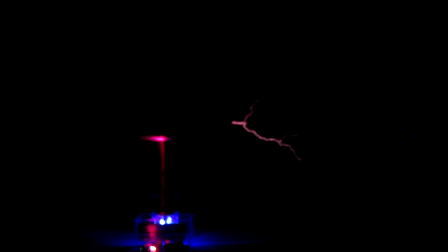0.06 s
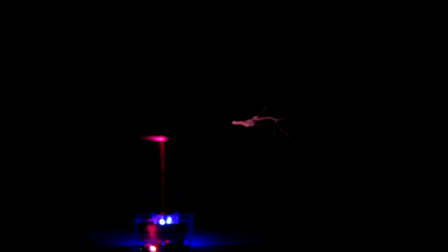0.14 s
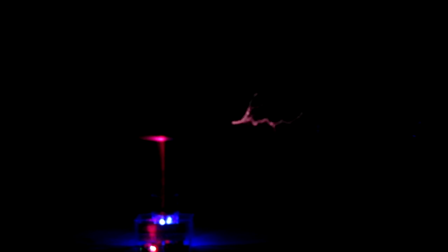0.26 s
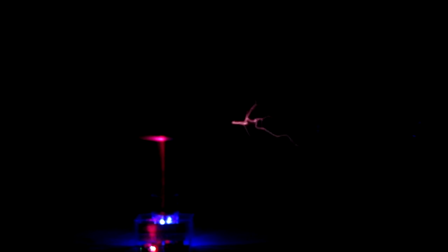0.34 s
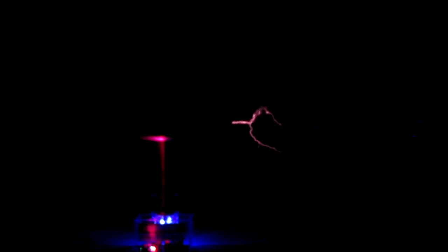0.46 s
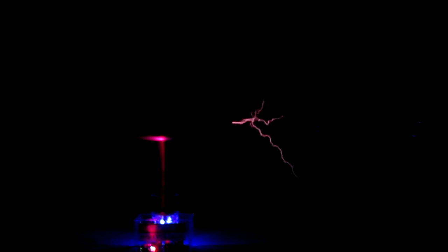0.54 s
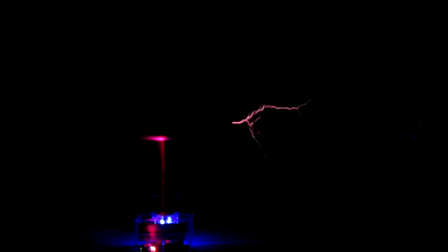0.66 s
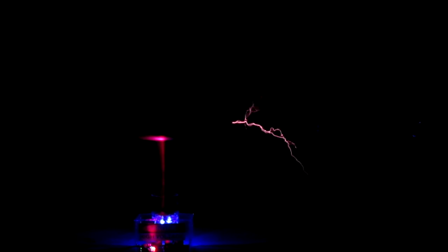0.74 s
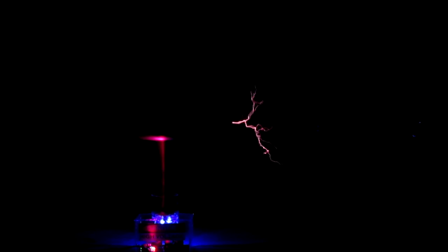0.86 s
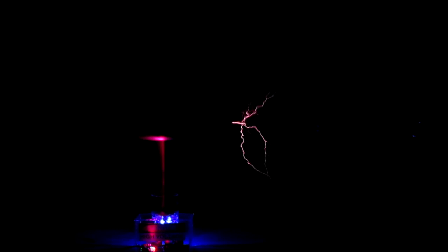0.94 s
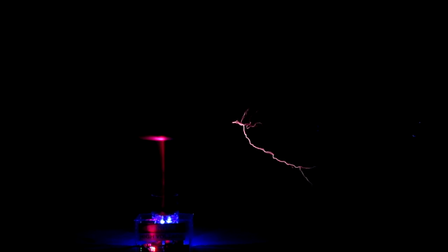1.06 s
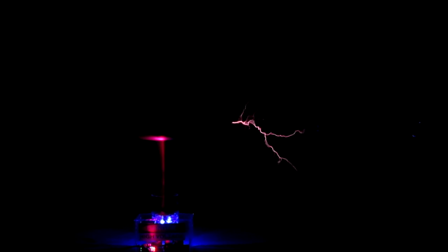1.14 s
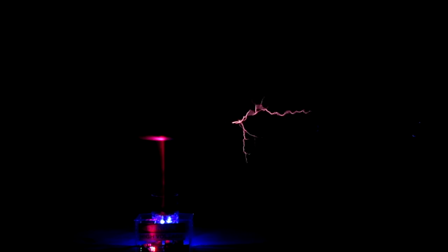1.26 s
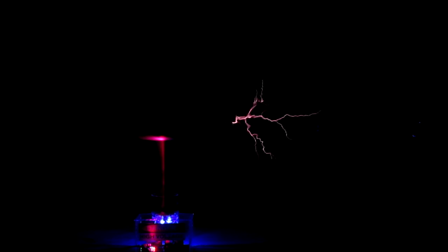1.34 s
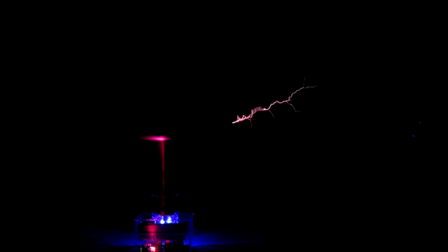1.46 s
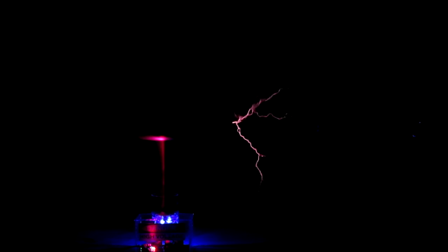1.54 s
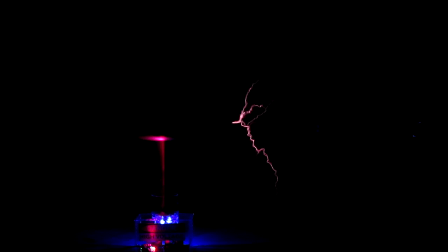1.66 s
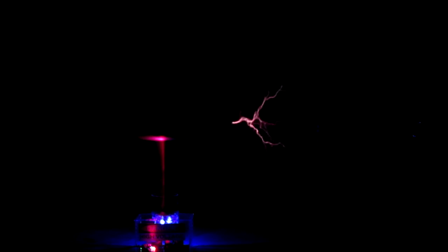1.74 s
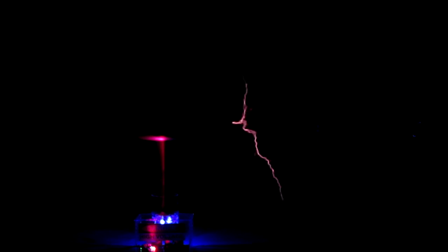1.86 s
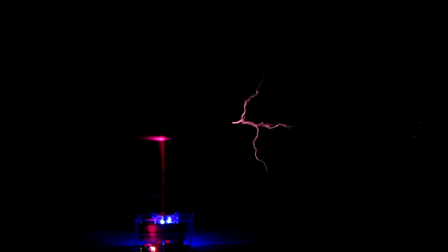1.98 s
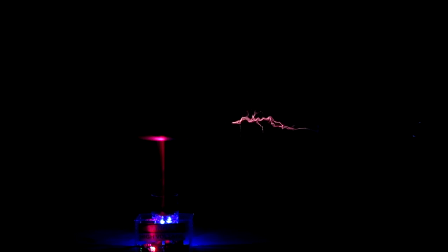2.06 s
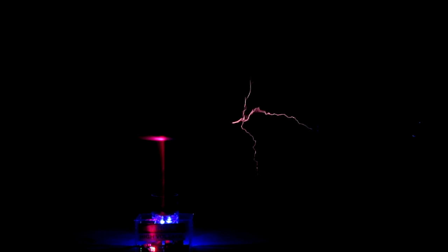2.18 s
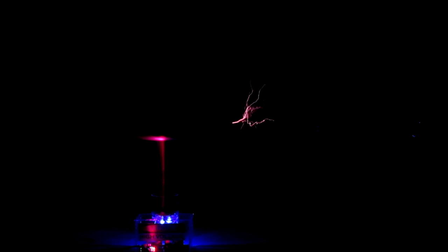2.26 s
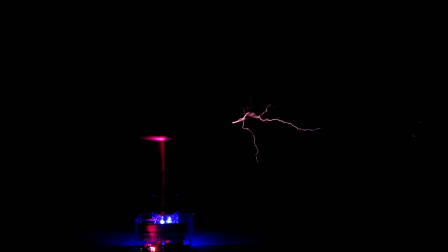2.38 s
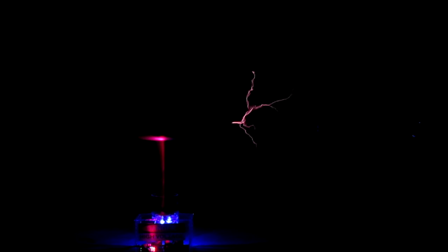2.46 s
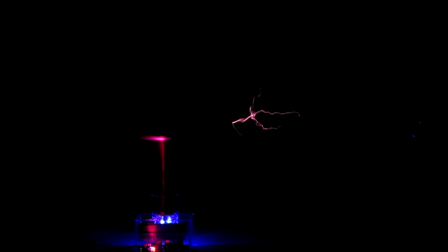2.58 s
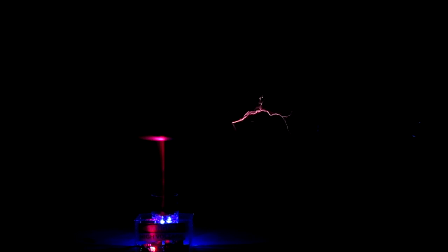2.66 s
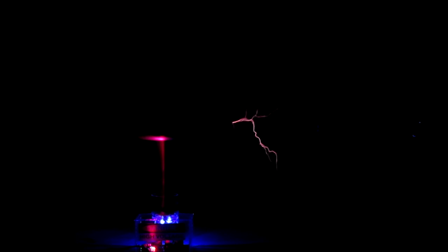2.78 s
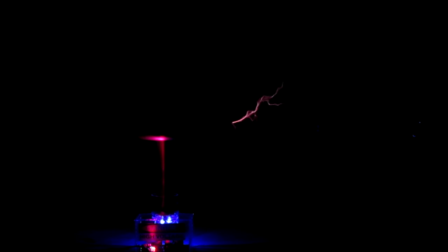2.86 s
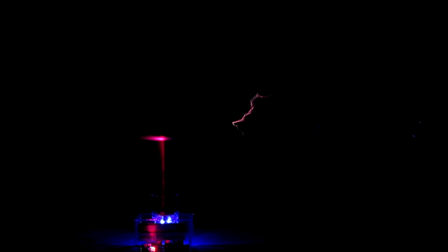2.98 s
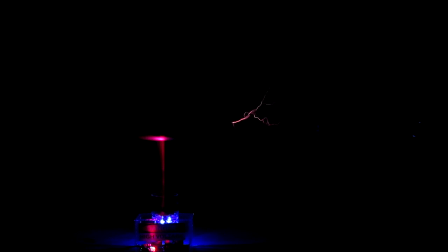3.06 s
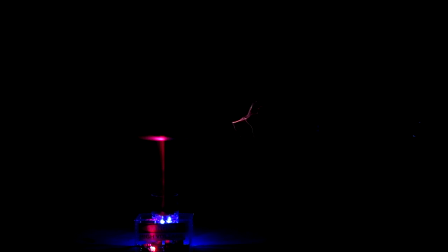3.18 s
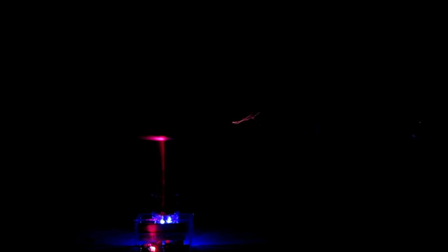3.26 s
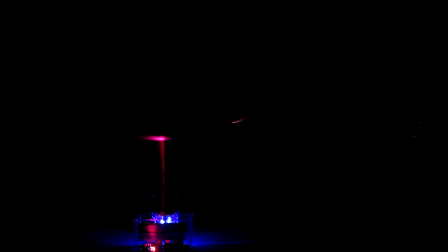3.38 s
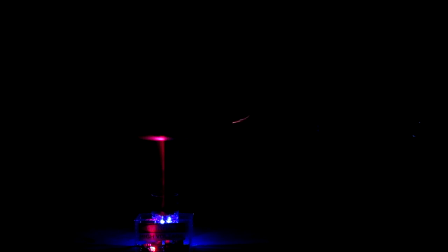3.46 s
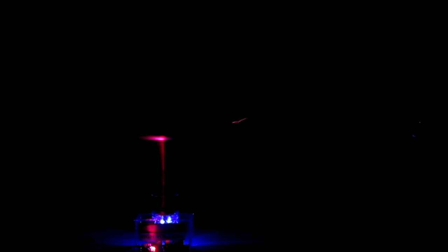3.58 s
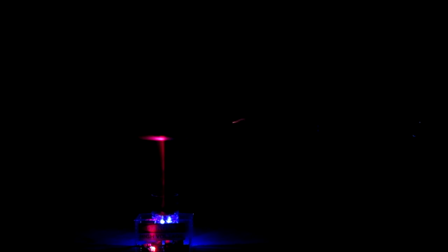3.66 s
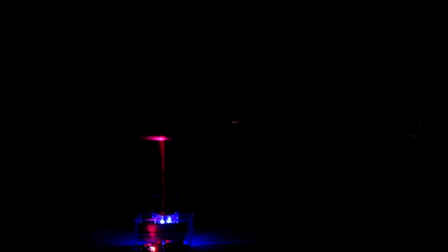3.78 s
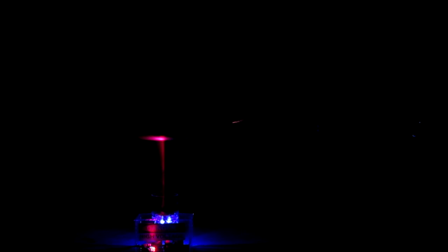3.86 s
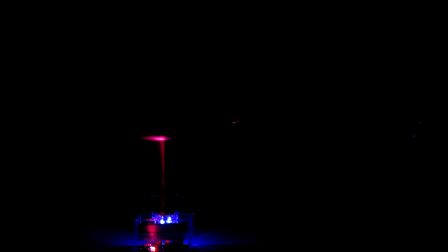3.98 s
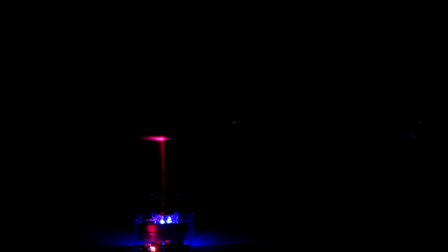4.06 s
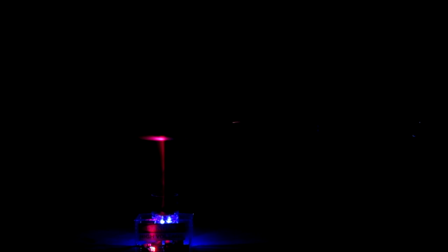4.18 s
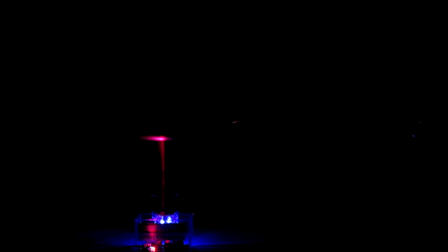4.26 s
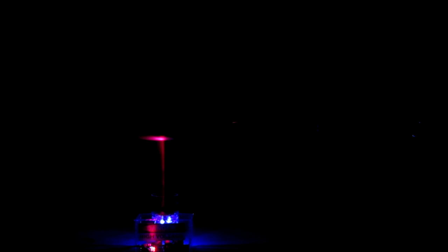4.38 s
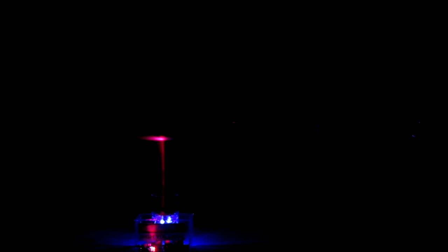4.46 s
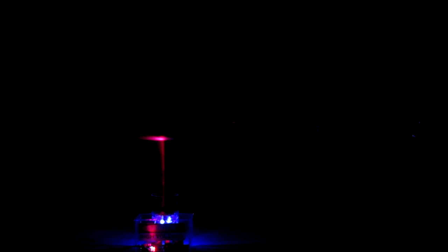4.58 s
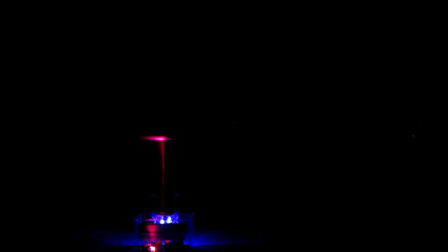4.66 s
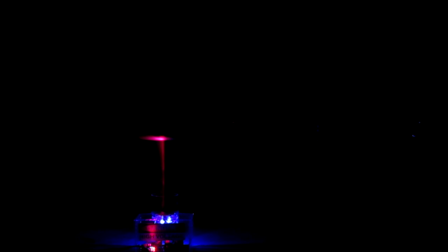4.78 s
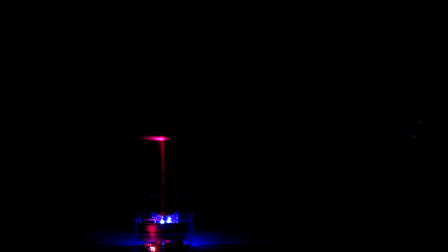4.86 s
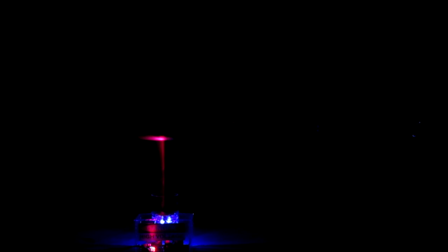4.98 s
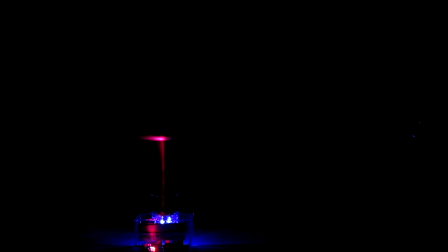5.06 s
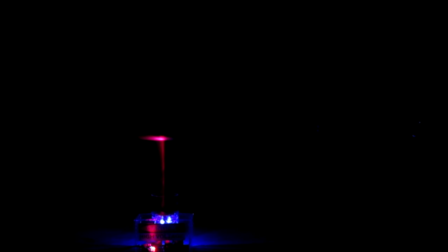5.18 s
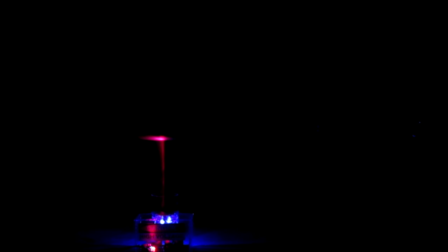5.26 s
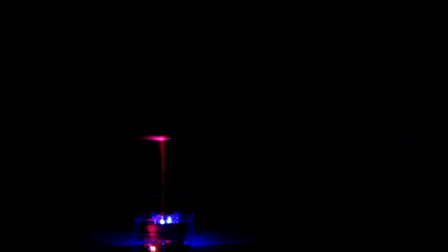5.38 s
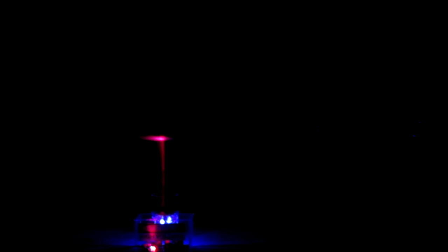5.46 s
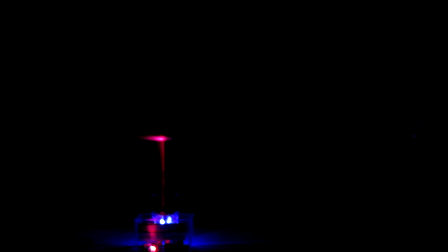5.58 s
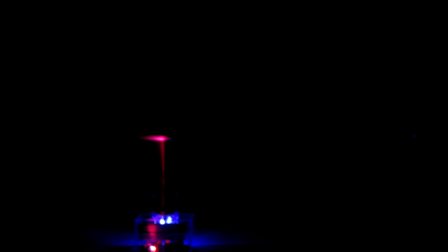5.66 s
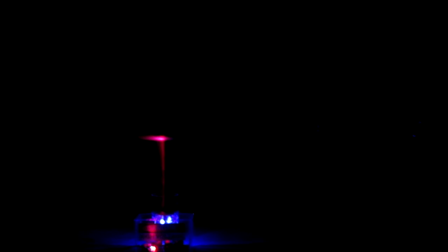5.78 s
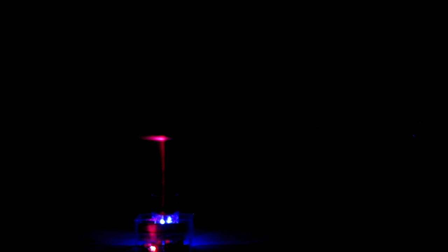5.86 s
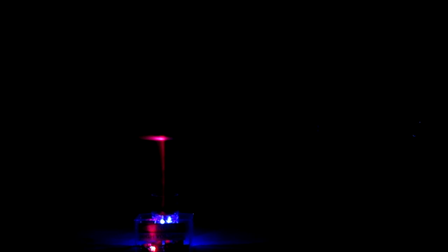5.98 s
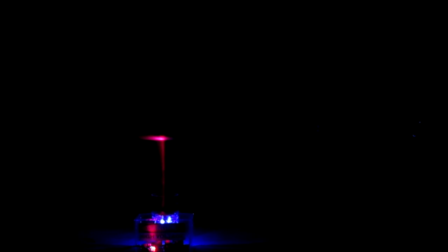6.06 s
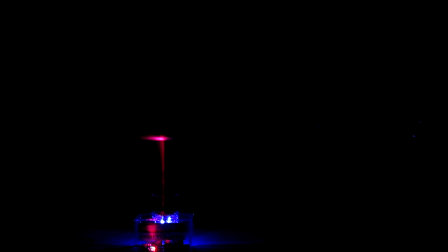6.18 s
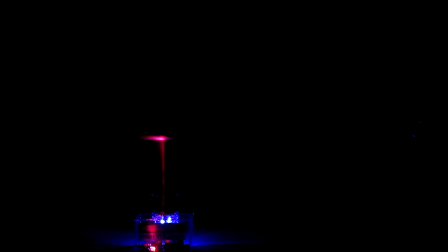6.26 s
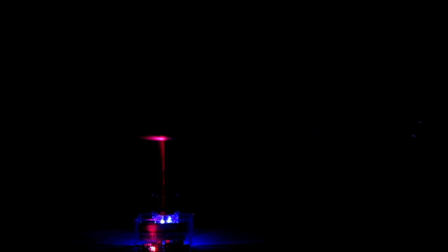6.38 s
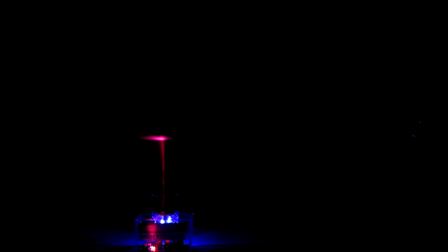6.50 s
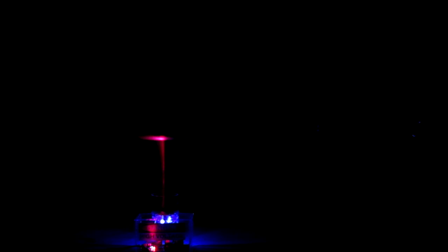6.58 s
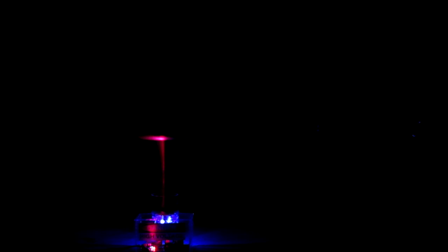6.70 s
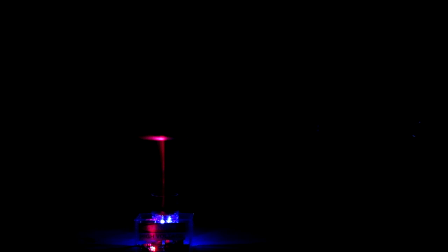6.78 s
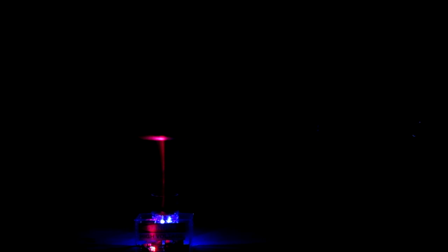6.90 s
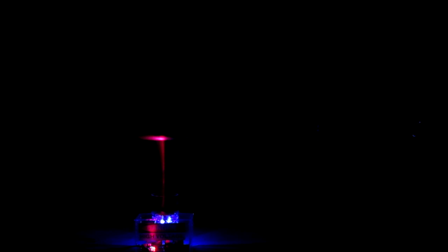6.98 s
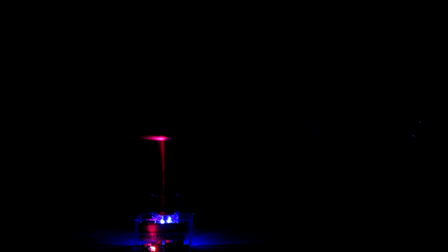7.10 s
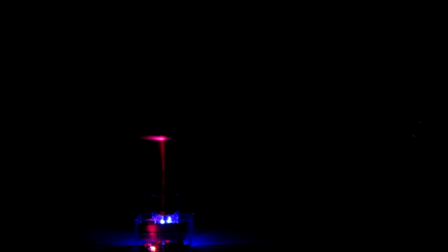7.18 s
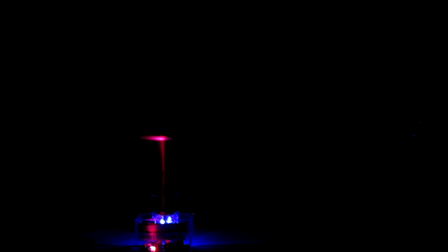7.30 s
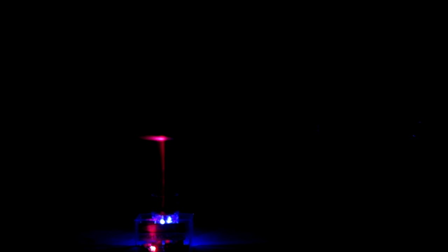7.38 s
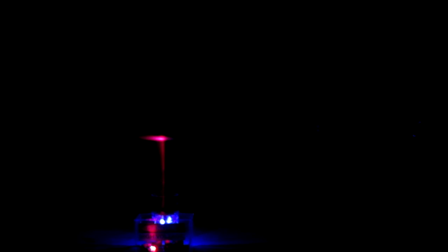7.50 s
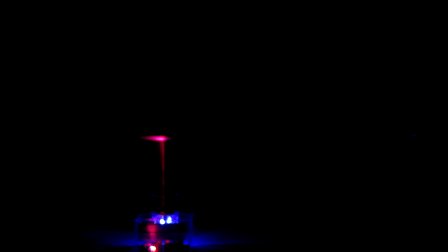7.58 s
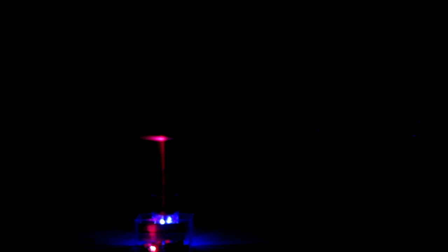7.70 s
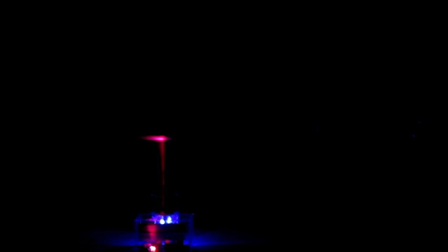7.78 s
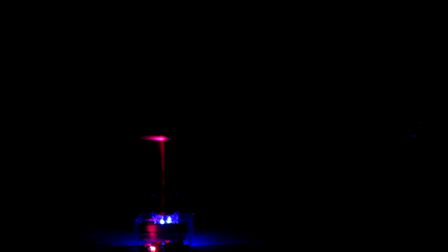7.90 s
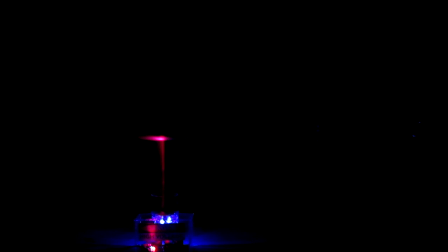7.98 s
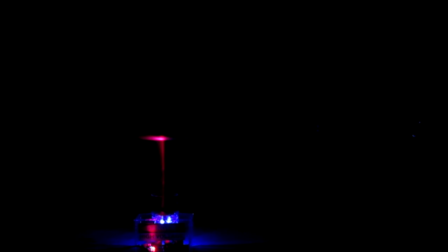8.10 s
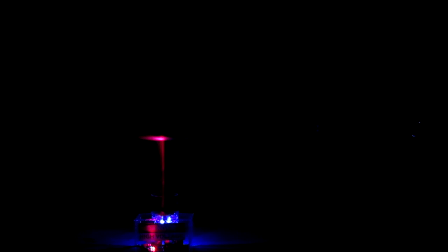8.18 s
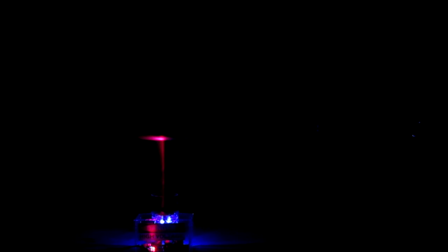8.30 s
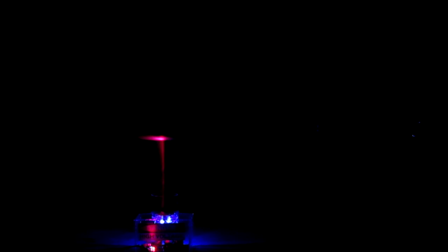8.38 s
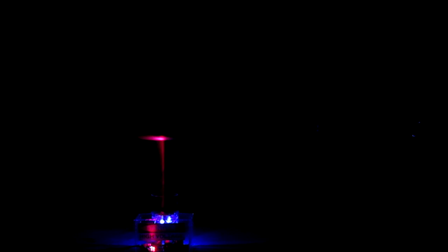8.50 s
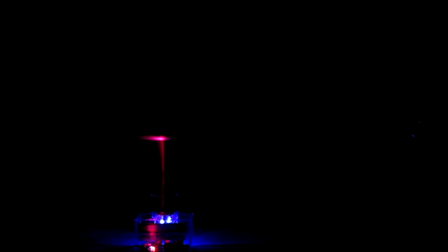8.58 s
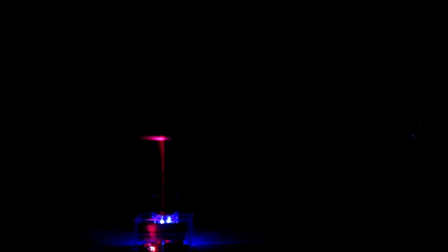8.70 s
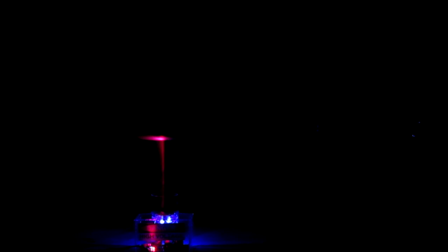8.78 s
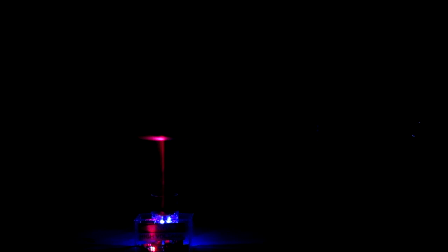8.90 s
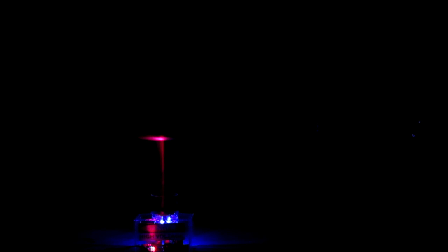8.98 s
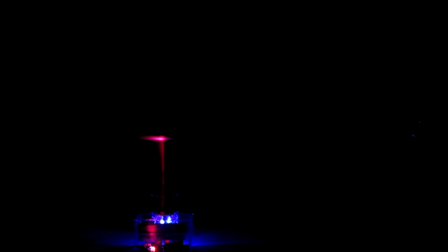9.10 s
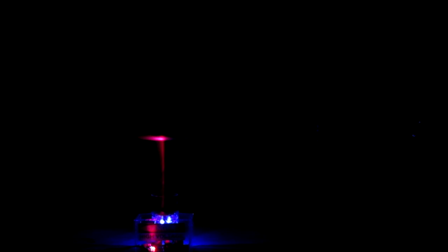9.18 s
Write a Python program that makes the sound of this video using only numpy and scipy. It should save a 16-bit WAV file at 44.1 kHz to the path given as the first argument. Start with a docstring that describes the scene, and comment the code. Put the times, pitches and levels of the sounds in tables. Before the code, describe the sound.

A high-voltage spark coil is already firing in a garage, picked up in stereo with hard, short reflections. From 0 to 3 s it is a loud, rasping buzz at about 214 bangs a second, sagging to 212 around 1 to 2 s, then creeping up; bright treble crackle and restless sputter ride on low harmonics, with dull pops near 2.3 and 3.0 to 3.2 s. From 3 s it weakens quickly, crackling in spurts until about 4.5 s, then drops in steps to a thin, steady, buzzing sizzle near 217 a second by 5 s. Sharp lone snaps come at about 5.0, 5.9, 6.2, 6.75 and 7.0 s. At 7.1 s the coil cuts off with a brief ring. Cooling fans, humming with several mid-low tones and rushing air, gradually swell as the recorder's gain recovers, and continue alone to the end; a faint dry tick falls at 8.8 s.

```python
"""In a garage, a high-voltage spark coil fires some 212 to 217 times a second, its cooling fans running.
Long branching sparks buzz harshly: each bang sends out shocks and drives the low harmonics of the buzz.
They shrink to a steady corona sizzle with a few lone snaps, and the coil is switched off.
The recorder's gain control recovers slowly as the sparks weaken, so that the fan tones and air rush swell.
A faint dry tick comes near the end."""
import sys
import numpy as np
from scipy import signal
from scipy.fft import rfft, irfft, next_fast_len
from scipy.io import wavfile
from scipy.ndimage import uniform_filter1d, map_coordinates

SR = 44100
rng = np.random.default_rng(int(sys.argv[2]) if len(sys.argv) > 2 else 0)


def store_pcm(level_fs):
    """Save levels as 16-bit WAV."""
    pcm = np.round(np.clip(level_fs, -1, 1) * 32767).astype(np.int16)
    wavfile.write(sys.argv[1], SR, np.atleast_2d(pcm).T)


N = 407484
LEAD = SR // 2  # samples run before time zero, so that everything is already sounding
TIME = np.arange(-LEAD, N) / SR  # s
SIZE = len(TIME)

# All levels are ahead of the recorder's gain control; spectra are relative.
# Tones of the fans. Each row: frequency in Hz, level in dB before the common trim.
FAN_TONES = [(91.5, -57), (118.4, -58.5), (140.0, -59), (177.6, -43.5), (274.5, -46.5), (333.8, -51),
             (387.6, -47), (414.5, -49), (554.5, -43), (726.7, -49), (969.0, -59), (1168, -56), (1459, -65)]
# Shaft rumble, and a second fan beating against the first. Each row: frequency in Hz, level in dB before the trim.
SLOW_FAN_TONES = [(27.8, -54.5), (174.5, -51)]
# Rush of air through the fans. Each row: frequency in Hz, level in dB per Hz.
FAN_RUSH = [(25, -16), (60, -14.5), (170, -8.5), (250, -13.5), (450, -10.5), (720, -9), (1100, -17.5),
            (1600, -18.5), (2200, -26.5), (4500, -36), (6500, -35.5), (10300, -44.5), (11000, -35.5),
            (11700, -44), (15500, -48)]
# Likeness of the air rush at left and right. Each row: frequency in Hz, likeness from 0 to 1.
FAN_LIKENESS = [(60, 0.29), (180, 0.95), (550, 0.73), (1650, 0.72), (5000, 0.033)]
FAN_TONES_DB, FAN_RUSH_DB = -24, -60  # trim of all tones; level of the rush

# A faint dry tick near the end. Each row: start in seconds, level in dB before its lift.
TICK = [(8.8385, -50)]
# Colour of the tick. Each row: frequency in Hz, level in dB per Hz.
TICK_COLOUR = [(1500, -26), (4500, -3), (7000, 1), (10000, -15), (15000, -22)]

# Surfaces near the coil. Each row: left delay in ms, right delay in ms, level in dB against direct sound.
NEAR_ECHOES = [(2.3, 2.9, -16), (4.5, 4.56, -11), (6.87, 6.89, -3.5), (7.05, 7.2, -11), (9.35, 9.25, -10)]
# Decay of the garage. Each row: frequency in Hz, time to fall by 60 dB in seconds.
GARAGE_DECAY = [(1000, 0.6), (5000, 0.43), (9000, 0.4), (15000, 0.25)]
TAIL_DB = -0.5  # diffuse tail against direct sound
# The nearest surface: delay left and right (ms), its swing as the arc moves (ms, per s), and its level
BOUNCE_MS = (.55, .575)
BOUNCE_SWING_MS, BOUNCE_SWINGS_PER_S, BOUNCE_DB = .07, 18, -3.5
# Standing waves that lift or cancel a harmonic sliding across them. Each row: centre in Hz, lift in dB.
STANDING_WAVES = [(646, -14.5), (865, -8), (1061, 11), (1069, -2.5), (1077, 7.5), (1286, 7), (1294, -3),
                  (1300, 8), (1485, 6.5), (1506, 11), (1697, 4), (1711, 5.5), (1950, -28)]
STANDING_WIDTH_HZ = 2.8
# Lean of the coil's sound between the sides. Each row: frequency in Hz, left minus right in dB.
COIL_BALANCE = [(400, 0.3), (700, 0.6), (1250, -1.5), (2400, -0.5), (4400, -2.2), (8100, 2.3), (15000, 1.5)]

# The interrupter. Each row: time in seconds, bangs per second.
FIRING = [(0, 214), (0.42, 214), (0.88, 212.1), (1.95, 212.12), (2.55, 213.9), (3.0, 214.67), (3.5, 215.3),
          (5.09, 216.1), (5.15, 216.63), (7.1, 216.63)]
OFF_S = 7.112  # switch-off
# Power fed to the sparks: full, then a slide and three steps down. Each row: time in seconds, power in dB.
POWER = [(0, 1.3), (2.7, 2.5), (3.02, -0.5), (3.5, -7.5), (4.0, -10.5), (4.32, -12), (4.35, -13.5),
         (4.63, -15.5), (4.655, -19), (4.925, -20.5), (4.945, -27), (7.1, -27)]
# The rate sags as the channel thickens and loads the supply: bangs per s, bare corona and thickest channel
IDLE_RATE, LOADED_RATE = 216.6, 212.1
THICKNESS_CURVE = 0.91
# Below these powers the branches settle and the tips stop sputtering (dB); share of tips lost when thick
WRITHE_FULL_DB, SPUTTER_FULL_DB, THICK_TIP_LOSS = -3, -12, 0.45
CORONA_ONLY_DB, CORONA_GONE_DB = -21, -9  # between these powers the streamer shrinks to bare corona

# Lone flashovers. Each row: start in seconds, level in dB before their lift.
SNAPS = [(4.9576, -28), (5.8905, -27.5), (6.1814, -27.5), (6.7538, -28), (7.0446, -28)]
# Colour of the flashovers. Each row: frequency in Hz, level in dB per Hz.
SNAP_COLOUR = [(600, -17), (1300, -16), (3300, -11), (6500, -3.5), (10000, -8), (16000, -11.5)]
# Dull pops as a long streamer flares. Each row: start in seconds, level in dB before their lift.
POPS = [(2.32, -7), (2.48, -22), (2.995, -11), (3.045, -17), (3.207, -26), (3.214, -9.5)]
# Colour of the pops. Each row: frequency in Hz, level in dB per Hz.
POP_COLOUR = [(60, -18), (200, -14), (450, 3), (800, 1), (2000, -2), (8000, -67)]

# Swells of the thump as the channel flares. Each row: centre in seconds, lift in dB.
THUMP_SWELLS = [(0.79, 5), (1.04, 6.5), (2.33, 7), (2.48, 10), (2.72, 2)]
SWELL_S = 0.02  # from the centre of a swell to 1/e of its lift
# At 0 dB of power: the sharp crack, the buzz of the channel, the thump of the heated air (dB)
CRACK_DB, BUZZ_DB, THUMP_DB = -18, -29, -44
# Buzz and thump shrink faster than the crack (dB per dB of power); a thick channel buzzes louder (dB)
BUZZ_FOLLOWS, THUMP_FOLLOWS, THICK_BUZZ_DB = 1.216, 2.24, 4
UPPER_FOLLOWS = 0.19  # extra shrinking of the upper harmonics, dB per dB of power
HARMONICS = 13
# Colour of the buzz. Each row: frequency in Hz, level in dB.
BUZZ_COLOUR = [(214, -5), (430, -4), (640, -11), (1100, -14), (1700, -13.5), (2000, -10.5), (2400, -15.5),
               (2800, -14)]

# Spells of crackle as the shrinking streamer forks. Each row: start in seconds, level in dB, fade in seconds.
CRACKLE_SPELLS = [(3.35, -24, .02), (3.605, -19, .025), (4.034, -18, .018), (4.218, -29, .02),
                  (4.27, -25, 0.044), (4.451, -19, 0.025), (4.975, -33, .025)]
# Colour of the crackle. Each row: frequency in Hz, level in dB per Hz.
CRACKLE_COLOUR = [(300, -50), (1200, -24), (2300, -11), (3300, 0), (4200, -5), (6500, -2), (10000, -14),
                  (16000, -22)]
SPIT_DB, SPIT_PATCHY_DB = -22, 3  # random spitting: level at 0 dB of power, and how patchy

# Crack of a thick channel. Each row: frequency in Hz, level in dB per Hz.
THICK_COLOUR = [(2500, -0.5), (3300, 2), (4200, -3.5), (5400, -1), (7000, -2.5), (8800, -5.5), (10500, -14),
                (13000, -13.5), (15500, -13)]
# Crack of a thin streamer. Each row: frequency in Hz, level in dB per Hz.
THIN_COLOUR = [(2500, -17.5), (3200, -7.5), (4200, -4), (5000, -4), (5900, -1), (7000, 0), (8800, -5),
               (10500, -11), (13000, -8), (15500, -8)]
# Crack of bare corona. Each row: frequency in Hz, level in dB per Hz.
CORONA_COLOUR = [(800, -18.5), (1300, -20), (1800, -13), (2350, -11), (2950, -6), (3500, -7), (4400, -3),
                 (5100, -3.5), (5900, 1), (7000, 1.5), (8700, -1), (10000, -5.5), (11500, -1.5),
                 (15500, -6)]
# Sputter of the tips. Each row: frequency in Hz, level in dB per Hz.
SPUTTER_COLOUR = [(5200, 1.5), (6800, 1), (8600, 3), (10200, -5.5), (12300, 0.5), (15500, -6)]
# Fine fizz that stays once the arc has settled. Each row: frequency in Hz, level in dB per Hz.
FIZZ_COLOUR = [(5200, -6), (9000, -6), (10500, -6), (12500, 0), (15000, 0), (17000, -8)]
FIZZ_SHARE, TIPS_LOW_HZ = .21, 4950  # fizz against the crack; lower edge of sputter and fizz

CUTOFF_HZ = 15950  # top of what the recorder keeps


def from_db(db):
    """Decibels to gain."""
    return 10 ** (np.asarray(db) / 20)


def rms_one(x):
    """Scale to rms 1."""
    return x / np.sqrt(np.mean(x ** 2) + 1e-20)


def evened(x, size=1640):
    """Hold the level near rms 1 from moment to moment, over a window of the given samples."""
    power = np.abs(uniform_filter1d(x ** 2, size=size))
    return x / np.sqrt(power + 1e-9)


def in_time(rows, at=TIME):
    """Each column of a curve at the given times."""
    s, *columns = np.transpose(rows)
    return [np.interp(at, s, c) for c in columns]


def at_hz(points, hz):
    """Read a table on a log-frequency axis."""
    f, value = np.transpose(points)
    return np.interp(np.log(np.maximum(hz, 1)), np.log(f), value)


def drift(per_s, at=TIME):
    """Smooth random wandering with a spread of about 1."""
    knots = signal.resample_poly(rng.standard_normal(2048), 4, 1)
    return np.interp((at - TIME[0]) * per_s * 4, np.arange(len(knots)), knots)


def colour(x, spectrum, size=1024):
    """Causal filter of unit energy with the given spectrum."""
    hz = np.linspace(0, SR / 2, size // 2 + 1)
    cepstrum = irfft(np.log(from_db(at_hz(spectrum, hz))))
    # folding the cepstrum forward gives minimum phase: a sharp onset
    cepstrum[1:size // 2] *= 2
    cepstrum[size // 2 + 1:] = 0
    pulse = irfft(np.exp(rfft(cepstrum)))
    return signal.oaconvolve(x, pulse / np.linalg.norm(pulse))[:len(x)]


def clicks(places, heights, length=SIZE):
    """Band-limited clicks at fractional sample places."""
    taps = np.floor(places).astype(int)[:, None] + np.arange(-4, 6)
    off = taps - places[:, None]
    shape = np.sinc(off) * np.sinc(off / 5)
    inside = np.clip(taps, 0, length).ravel()
    return np.bincount(inside, (shape * heights[:, None]).ravel(), length + 1)[:length]


def fans(waver_db=2.5, waver_rad=0.49, width_rad=0.15, lag=4):
    """Blade and motor tones over a smooth rush of air; the right side lags some samples, leaning it left."""
    hz = np.linspace(0, SR / 2, next_fast_len(SIZE) // 2 + 1)
    alike = np.clip(at_hz(FAN_LIKENESS, hz), 0, 1)
    mid, side = rfft(rng.standard_normal((2, 2 * len(hz) - 2)))
    air = np.sqrt(1 + alike) * mid + np.sqrt(1 - alike) * side * [[1], [-1]]
    rush = rms_one(irfft(air * from_db(at_hz(FAN_RUSH, hz)))[:, :SIZE])
    tones = 0
    for k, (tone_hz, level_db) in enumerate(list(FAN_TONES) + list(SLOW_FAN_TONES)):
        phase = 2 * np.pi * (tone_hz * TIME + rng.random()) + waver_rad * drift(3.7)
        apart = width_rad * (-1) ** k * np.array([[1], [-1]])
        gain = from_db(level_db + waver_db * drift(6))
        tones = tones + np.sqrt(2) * gain * np.sin(phase + apart)
    left, right = from_db(FAN_RUSH_DB) * rush + from_db(FAN_TONES_DB) * tones
    return np.array([left, np.roll(right, round(lag))])


def unrest(full_db, at=TIME):
    """Restlessness 0-1: full above the given power, dying in proportion below it."""
    power_db, = in_time(POWER, at)
    return np.minimum(from_db(power_db - full_db), 1)


def writhing(at=TIME):
    """How freely the arc moves, 0-1: it settles quickly once the power falls."""
    return unrest(WRITHE_FULL_DB, at) ** 2


def thickness_at(at=TIME):
    """Thickness of the channel 0-1, which goes with the sag of the firing rate."""
    rate, = in_time(FIRING, at)
    sag = np.clip((IDLE_RATE - rate) / (IDLE_RATE - LOADED_RATE), 0, 1)
    return sag ** THICKNESS_CURVE


def bang_times(turns):
    """The moments at which the interrupter fires: one at each whole turn."""
    return np.interp(np.arange(1, int(turns[-1])), turns, TIME)


def bounce(x):
    """Reflection from the nearest surface; its delay swings as the arc moves, so its comb colour shifts."""
    swing_ms = BOUNCE_SWING_MS * writhing()
    sides = []
    for ms in BOUNCE_MS:
        delay_ms = ms + swing_ms * drift(BOUNCE_SWINGS_PER_S)
        places = np.arange(SIZE) - delay_ms * SR / 1000
        sides.append(from_db(BOUNCE_DB) * map_coordinates(x, [places], order=3))
    return sides


def garage(x, build_s=0.016):
    """Direct sound, echoes from near surfaces, and a diffuse tail whose treble dies first."""
    t = np.arange(SR * 2 // 3) / SR
    edges = np.geomspace(500, 18000, num=9)  # Hz
    tail = 0
    for low, high in zip(edges, edges[1:]):
        band_pass = signal.butter(2, [low, high], "band", fs=SR, output="sos")
        band = signal.sosfilt(band_pass, rng.standard_normal((2, len(t))))
        t60 = at_hz(GARAGE_DECAY, np.sqrt(low * high))
        tail = tail + band * from_db(-60 * t / t60) / np.sqrt(t60)
    tail = rms_one(tail * (1 - np.exp(-t / build_s)))
    tail = from_db(TAIL_DB) * tail / np.sqrt(len(t))
    *sides_ms, echo_db = np.transpose(NEAR_ECHOES)
    out = []
    for delay_ms, diffuse, near in zip(sides_ms, tail, bounce(x)):
        response = diffuse + clicks(delay_ms * SR / 1000, from_db(echo_db), len(t))
        response[0] += 1  # direct sound
        strength = np.hypot(np.linalg.norm(response), from_db(BOUNCE_DB))
        out.append((signal.oaconvolve(x, response)[:SIZE] + near) / strength)
    return np.array(out)


def standing_db(hz):
    """Lift or dip that the standing waves give to a gliding tone."""
    grid = np.arange(3000.)
    lift = sum(db * np.exp(-((grid - centre) / STANDING_WIDTH_HZ) ** 2 / 2) for centre, db in STANDING_WAVES)
    return np.interp(hz, grid, lift)


def sided(x):
    """Lean each register of the coil left or right by a level difference between the sides."""
    size = next_fast_len(SIZE)
    hz = np.arange(size // 2 + 1) * SR / size
    lean_db = at_hz(COIL_BALANCE, hz) * np.array([[.5], [-.5]])
    return irfft(rfft(x, size) * from_db(lean_db), size)[:, :SIZE]


def snaps(events, spectrum, level_db):
    """Single sparks, pops or ticks: coloured impulses, all lifted by level_db."""
    s, event_db = np.transpose(events)
    return colour(clicks(s * SR + LEAD, from_db(event_db + level_db)), spectrum)


def buzz(turns, rate, thump_rough=0.35, buzz_rough=0.1, width_rad=0.34, rumble_db=-28, sway_db=3.5,
         sway_rad=0.23, ring_share=0.75, surge_db=0.2):
    """The low harmonics: the whole channel swells at each bang and drives the garage's standing waves."""
    sway_per_s, scatter_rad = 44, .6
    power_db, = in_time(POWER)
    writhe = unrest(WRITHE_FULL_DB)
    # each bang has its own energy
    heat = writhe * np.interp(turns, np.arange(4096), rng.standard_normal(4096))
    swell_db = sum(db * np.exp(-((TIME - s) / SWELL_S) ** 2) for s, db in THUMP_SWELLS)
    surge = surge_db * writhe * drift(16)
    air = from_db(THUMP_DB + THUMP_FOLLOWS * power_db + surge + swell_db)
    thump = air * (1 + thump_rough * heat)
    channel_db = BUZZ_DB + BUZZ_FOLLOWS * power_db + THICK_BUZZ_DB * thickness_at()
    channel = from_db(channel_db) * (1 + buzz_rough * heat)
    out = from_db(rumble_db) * air * heat * np.ones((2, 1))
    for k in range(1, HARMONICS + 1):
        lift_db = standing_db(k * rate)
        # a ringing standing wave steadies its harmonic
        loose = writhe * from_db(-ring_share * np.maximum(lift_db, 0))
        # branches interfere, the upper harmonics most
        fading = .6 * drift(sway_per_s) + np.sqrt(k / HARMONICS) * drift(sway_per_s / 3)
        upper_db = UPPER_FOLLOWS * (k > 7) * power_db
        gain = from_db(at_hz(BUZZ_COLOUR, k * IDLE_RATE) + lift_db + sway_db * loose * fading + upper_db)
        # the path to the channel keeps changing
        shake = loose * (drift(sway_per_s / 2) + drift(2 * sway_per_s) / 2)
        phase = 2 * np.pi * k * turns + scatter_rad * rng.standard_normal() + sway_rad * np.sqrt(k) * shake
        apart = width_rad * ((-1) ** k + writhe * drift(12)) * np.array([[1], [-1]])
        source = thump if k <= 2 else channel
        out = out + np.sqrt(2) * gain * source * np.sin(phase + apart)
    # after switch-off the garage rings down
    dying = from_db(-60 * np.maximum(TIME - OFF_S, 0) / at_hz(GARAGE_DECAY, 1000))
    return out * dying


def filaments(bangs, spread_ms, strength=1, count=8):
    """A scatter of small shocks that forms anew just after each bang."""
    delay_ms = spread_ms * rng.exponential(1, (count, len(bangs)))
    places = (bangs + delay_ms / 1000) * SR + LEAD
    heights = strength * rng.standard_normal(places.shape)
    return clicks(places.ravel(), heights.ravel())


def crackles(bangs, spread_ms=0.57):
    """Short-lived forks spit at each bang: in random patches under high power, and in spells that die away."""
    power_db, = in_time(POWER, bangs)
    patch_db = SPIT_DB + power_db + SPIT_PATCHY_DB * drift(16, bangs)
    patches = unrest(WRITHE_FULL_DB, bangs) * from_db(patch_db)
    spells = 0
    for s, db, fade_s in CRACKLE_SPELLS:
        spells = spells + from_db(db) * (bangs >= s) * np.exp(-np.abs(bangs - s) / fade_s)
    return colour(filaments(bangs, spread_ms, np.hypot(patches, spells), count=3), CRACKLE_COLOUR)


def tips(bangs, spectrum, spread_ms=.7):
    """Fine filaments at the ends: a bright sputter held near rms 1, with the low end filtered away."""
    train = colour(filaments(bangs, spread_ms), spectrum)
    high_pass = signal.butter(12, TIPS_LOW_HZ, "high", fs=SR, output="sos")
    return evened(signal.sosfilt(high_pass, train))


def branches(bangs, reach_ms=0.697, far_loss_db=8.0, count=7):
    """At each bang every branch sends a shock, weaker from further out, its travel time shifting as it writhes."""
    sway_per_s, sway_ms, wander_per_s, wander_ms = 13, 0.07, 30, 0.026
    jitter_ms, flicker_db = 0.002, 0.3
    writhe = writhing(bangs)
    train = 0
    for branch in range(count):
        far = branch / (count - 1)  # from the electrode (0) out to the tips (1)
        place_ms = far * (reach_ms + writhe * sway_ms * drift(sway_per_s, bangs))
        shake_ms = wander_ms * drift(wander_per_s, bangs) + jitter_ms * rng.standard_normal(len(bangs))
        delay_ms = place_ms + writhe * (.5 + far) * shake_ms
        flicker = flicker_db * rng.standard_normal(len(bangs))
        flare_db = writhe * (4 * drift(wander_per_s, bangs) + flicker)
        # side branches come and go; they vanish as the streamer settles
        strength = writhe * drift(sway_per_s, bangs) if branch else 1
        heights = strength * from_db(flare_db - far_loss_db * far)
        train = train + clicks((bangs + delay_ms / 1000) * SR + LEAD, heights)
    return train


def cracks(bangs, tips_share=0.47, flare_db=0.37, low_hz=2800):
    """Shocks of branches and tips; a thick channel cracks duller than a thin streamer or corona."""
    power_db, = in_time(POWER)
    thickness = thickness_at()
    bare = np.interp(power_db, [CORONA_ONLY_DB, CORONA_GONE_DB], [1, 0])
    train = branches(bangs)
    arc = thickness * colour(train, THICK_COLOUR) + (1 - thickness) * colour(train, THIN_COLOUR)
    arc = signal.sosfiltfilt(signal.butter(6, low_hz, "high", fs=SR, output="sos"), arc)
    shocks = evened((1 - bare) * arc + bare * colour(train, CORONA_COLOUR))
    free_tips = unrest(SPUTTER_FULL_DB) * (1 - THICK_TIP_LOSS * thickness)
    sputter = tips_share * free_tips * tips(bangs, SPUTTER_COLOUR)
    fizz = FIZZ_SHARE * (1 - writhing()) * tips(bangs, FIZZ_COLOUR)
    flare = flare_db * unrest(WRITHE_FULL_DB) * drift(9.71)
    return (shocks + sputter + fizz) * from_db(CRACK_DB + power_db + flare) * (TIME < OFF_S)


def scene():
    """The coil's sparks in the garage, over its fans, with one dry tick."""
    rate, = in_time(FIRING)
    turns = np.cumsum(rate) / SR
    bangs = bang_times(turns)
    tick = snaps(TICK, TICK_COLOUR, level_db=6.0)
    lone = snaps(SNAPS, SNAP_COLOUR, level_db=17.5) + snaps(POPS, POP_COLOUR, level_db=0.5)
    sparks = garage(cracks(bangs) + crackles(bangs) + lone)
    coil = sided(sparks + buzz(turns, rate))
    return (fans() + tick + coil)[:, LEAD:]


def gain_control(x, target_db=-16.5, release_db_per_s=4.0):
    """Loud sound holds the gain down; afterwards it creeps back up."""
    power = np.abs(uniform_filter1d(np.mean(x ** 2, axis=0), size=12000))
    level_db = 10 * np.log10(power + 1e-12)
    creep = release_db_per_s * np.arange(x.shape[1]) / SR
    held_db = np.maximum.accumulate(level_db + creep) - creep
    return x * from_db(target_db - held_db)


def record(dry, notch_hz=7870, notch_q=45):
    """A narrow notch in the microphone's treble, slow gain control, rounded peaks, and the top cut off."""
    notched = signal.lfilter(*signal.iirnotch(notch_hz, notch_q, fs=SR), dry)
    loud = gain_control(notched)
    rounded = loud / (1 + (loud / .7) ** 4) ** .25
    low_pass = signal.firwin(301, CUTOFF_HZ, fs=SR)[None]
    return signal.oaconvolve(rounded, low_pass, "same", axes=1)


dry = scene()
out = record(dry)
store_pcm(out)
```